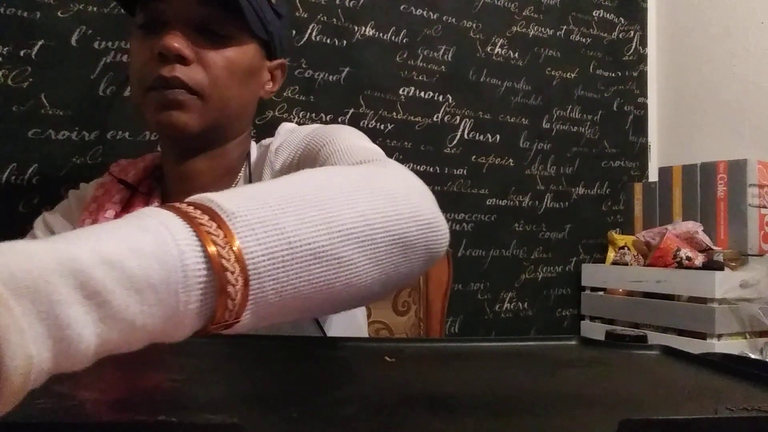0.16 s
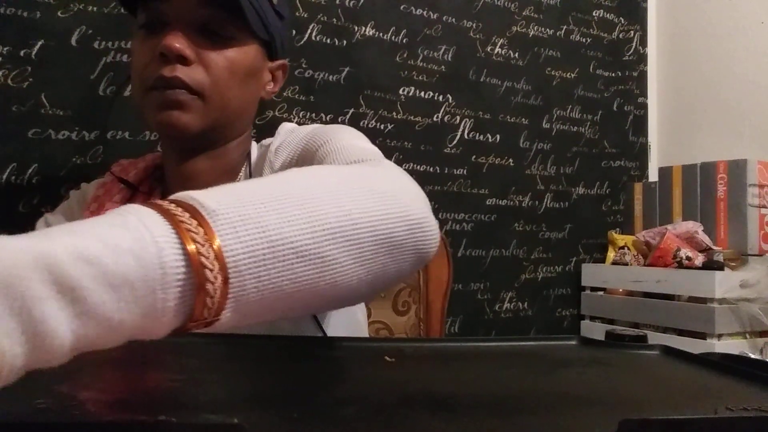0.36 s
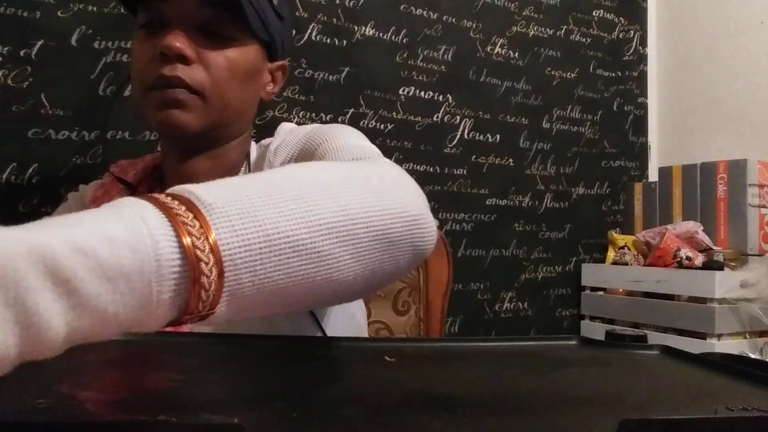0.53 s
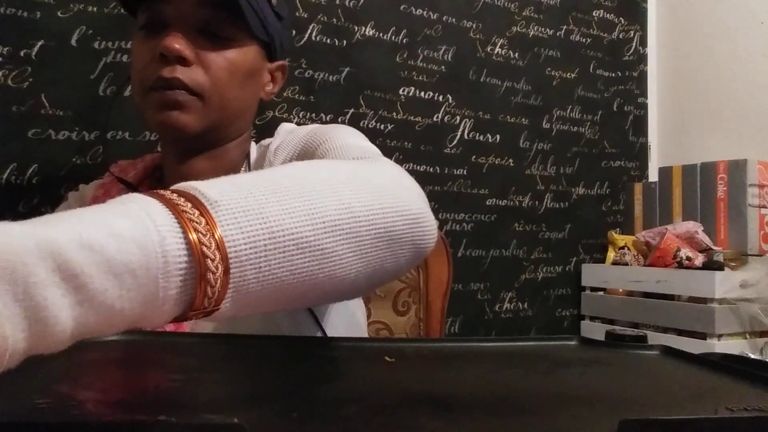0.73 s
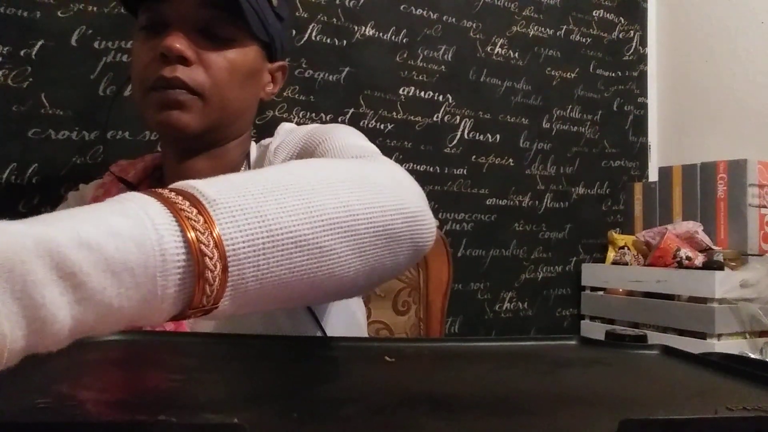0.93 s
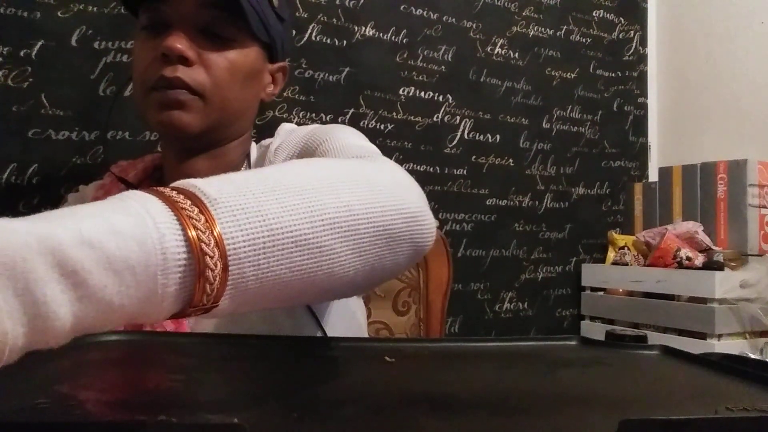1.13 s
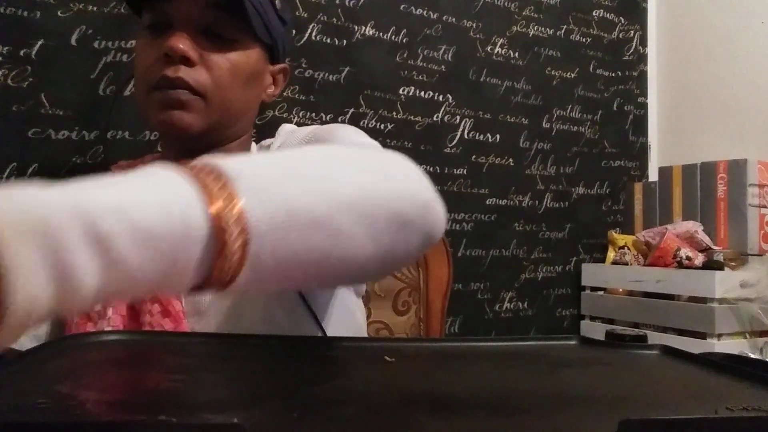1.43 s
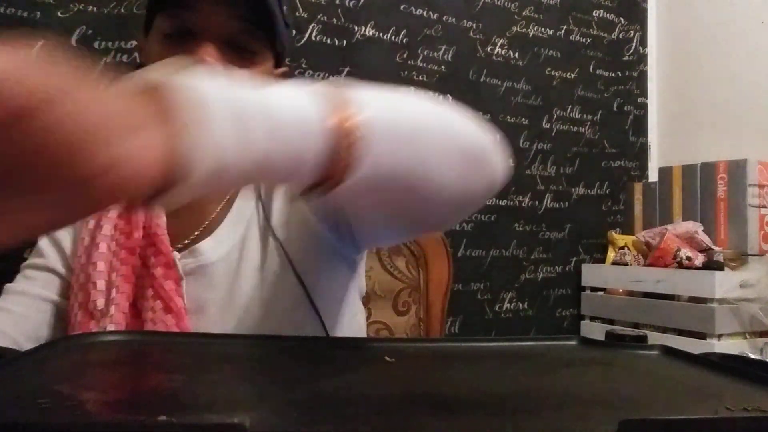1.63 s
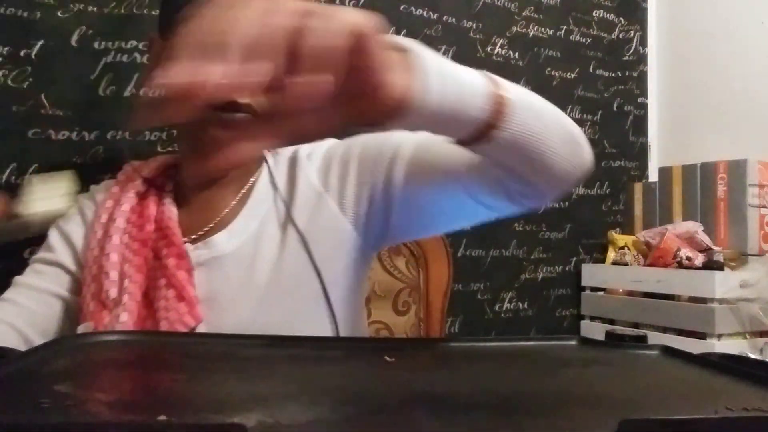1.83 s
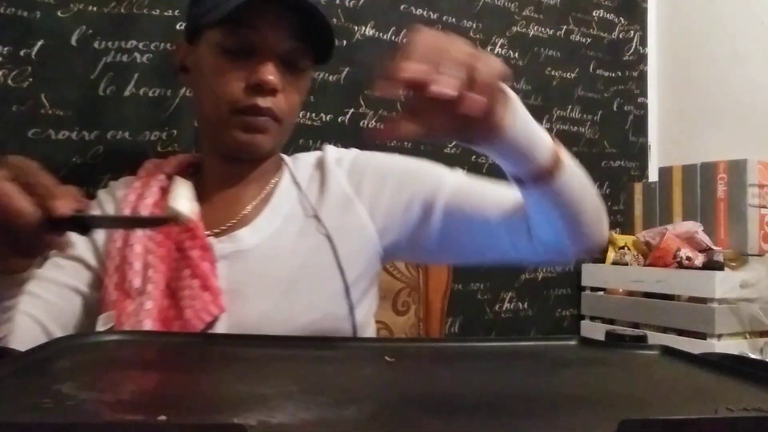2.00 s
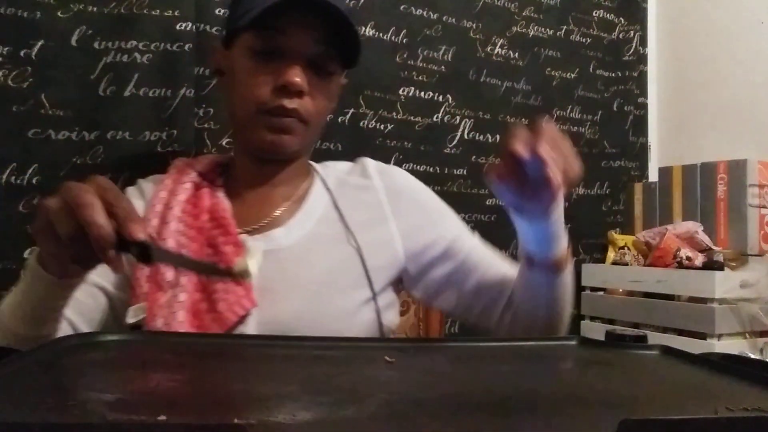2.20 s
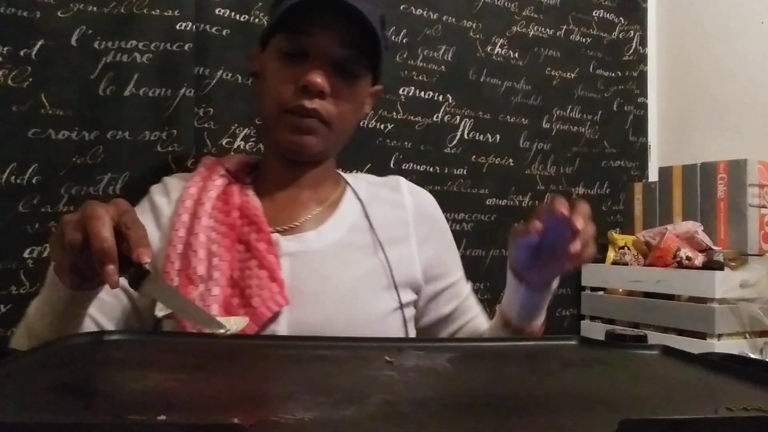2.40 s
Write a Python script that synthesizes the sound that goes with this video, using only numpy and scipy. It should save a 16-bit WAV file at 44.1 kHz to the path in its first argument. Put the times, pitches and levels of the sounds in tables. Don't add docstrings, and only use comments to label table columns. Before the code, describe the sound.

A sharp, bright plastic lid snap at about 1.06 s is by far the loudest sound. Before it, a faint slide, two light knife clinks on a dish at 0.25 and 0.29 s with slight ringing, a quick crackly saw through butter at 0.46-0.57 s, and a soft scuff near 0.9 s. Short kitchen echo follows, then faint bumps and tiny ticks over low fan hum and hiss.

```python
import sys
import numpy as np
from scipy import signal
from scipy.fft import rfft, irfft
from scipy.io import wavfile
from scipy.ndimage import uniform_filter1d

SR = 44100
rng = np.random.default_rng(int(sys.argv[2]) if len(sys.argv) > 2 else 0)


def gain_from_db(level_db):
    decades = np.asarray(level_db, float) / 20
    return 10 ** decades


def output_pcm(signal):
    pcm = np.clip(np.atleast_2d(signal).T, -1, 1) * 32767
    wavfile.write(sys.argv[1], SR, np.round(pcm).astype(np.int16))


N = 112454


def evened(x):
    return x / np.sqrt(np.mean(x ** 2) + 1e-20)


def read(points, hz):
    f, value = np.transpose(points)
    return np.interp(np.log(hz + 1), np.log(f + 1), value)


def add(mix, start_s, sound):
    part = mix[round(start_s * SR):][:len(sound)]
    part += sound[:len(part)]


def resonate(x, hz, width):
    turn = np.exp(2j * np.pi * hz * np.arange(len(x)) / SR)
    pole = np.exp(-np.pi * abs(width) / SR)
    return 2 * (turn * signal.lfilter([1 - pole], [1, -pole], x / turn)).real


def body(x, modes):
    out = 0
    for k, (hz, width, db) in enumerate(modes):
        once = resonate(x, hz, 0.99 * width)
        out = out + (-1) ** k * gain_from_db(db) * resonate(once, hz, 0.99 * width)
    return out


def clicks(events, modes, rise_share, low_width, echo_db, room_db):
    direct, crack, energy = out = np.zeros((3, N))
    t = np.arange(1500) / SR
    for s, db, fall, low_hz, low_db in events:
        fall = max(fall, 1e-4)
        rise = max(rise_share * fall, 5e-5)
        envelope = np.where(t < rise, (t / rise) ** 2, np.exp(-(t - rise) / fall))
        drive = rng.standard_normal(len(t)) * envelope
        bright = body(drive, modes)
        bright = gain_from_db(db) * bright / abs(bright).max()
        impulse = 1. * (t == t[round(rise * SR)])
        deep = body(impulse, [(low_hz, low_width, 0)])
        strength = np.linalg.norm(bright)
        start = s - rise / 2
        add(direct, start, bright + gain_from_db(db + low_db) * deep / abs(deep).max())
        add(crack, start, gain_from_db(echo_db) * drive * strength / np.linalg.norm(drive))
        onset = min(e[0] for e in events if e[0] > s - 1 / 200)
        add(energy, onset, np.array([gain_from_db(room_db) * strength]))
    return out


def drag(curve, low, high, low_db):
    out, size = np.zeros(N), SR // 5
    unevenness = 1.4 * rng.exponential(1, size // 64 + 1).repeat(64)[:size]
    grit = rng.standard_normal(size) * gain_from_db(unevenness)
    s, db = np.transpose(curve)
    level = gain_from_db(np.interp(s[0] + np.arange(size) / SR, s, db, -150, -150))
    rub = evened(body(grit, high)) + gain_from_db(low_db) * evened(body(grit, low))
    add(out, max(s[0], 0), level * evened(rub))
    return out


# (time [s], peak level [dB], decay [s], extra mode [Hz], its level [dB])
TAPS = [(.2240, -39, 0.0019, 2310, -10), (.2523, -24, 0.0016, 2120, -20), (.2527, -46.5, .0005, 3120, 3),
        (.2635, -39, 0.00081, 8100, -3), (.2891, -24.5, 0.0016, 2290, -1.5),
        (.2892, -43.5, .0005, 4100, 11), (.2893, -41, 0.00075, 900, -1.5),
        (.2896, -43.5, 0.00069, 5050, 9.5), (.3006, -32.5, 0.00054, 2100, -9),
        (.3041, -48.5, 0.0019, 900, 3.5), (.3136, -44, .002, 9000, 3)]
# (frequency [Hz], bandwidth [Hz], level [dB])
DISH = [(1500, 950, -10), (3760, 690, 4), (5200, 1300, -1), (8260, 1530, 3), (9400, 2100, -11),
        (12200, 1500, -8.5)]


def dish_taps():
    return clicks(TAPS, DISH, 0.23, 390, echo_db=-1.5, room_db=-3.0)


# (time [s], peak level [dB], decay [s], extra mode [Hz], its level [dB])
SLIPS = [(.4617, -37.5, .0007, 2030, -1.5), (.4634, -26, 0.0014, 1500, -12),
         (.4725, -35.5, .0007, 3500, -6.5), (.4752, -38, .0006, 2300, -6), (.4870, -34.5, .001, 3720, -4.5),
         (.4888, -29.5, 0.0012, 730, -9), (.4995, -47, .001, 1800, -15), (.5119, -36, 0.00089, 3810, -6),
         (.5136, -25.5, 0.001, 1500, -20.5), (.5208, -39, .0008, 6300, -5), (.5243, -41, .0006, 1500, -12),
         (.5364, -30.5, 0.001, 2170, -20), (.5406, -42, .0006, 5200, -12),
         (.5428, -30.5, 0.0016, 2210, -14), (.551, -45, 0.0014, 1500, -15), (.5570, -38, .0012, 1010, -20),
         (.5606, -32.5, 0.0006, 2110, -18.5), (.5690, -40.5, .0015, 2000, -18)]
# (frequency [Hz], bandwidth [Hz], level [dB])
BLADE = [(3470, 1460, -4.5), (5280, 1470, -2), (7870, 1210, 8), (9060, 3400, -6.5), (11700, 2000, -11),
         (14000, 3000, -22)]


def butter_slips():
    return clicks(SLIPS, BLADE, 1.7, 550, echo_db=-12., room_db=-8.5)


# (time [s], level [dB])
DRAG = [(.455, -79), (0.464, -50.5), (.51, -53), (0.549, -48.5), (.572, -57), (.585, -87)]
# (frequency [Hz], bandwidth [Hz], level [dB])
BLADE_LOW = [(750, 550, -0.45), (1600, 440, -2.1), (2300, 670, -0.94)]


def blade_drag():
    return drag(DRAG, BLADE_LOW, BLADE, low_db=-4.0)


# (time [s], peak level [dB], decay [s], extra mode [Hz], its level [dB])
SNAPS = [
    (1.0593, -43, 0.00085, 500, -3),
    (1.0610, -13, 0.00018, 800, -25),
    (1.0614, -8.5, 0.00021, 1850, -20.5),
    (1.0622, -10.5, 0.00023, 2280, -25),
    (1.0624, -30, 0.00032, 6000, 9),
    (1.0626, -33, 0.00034, 4450, 9),
    (1.0633, -21, .002, 1880, -18),
]
# (frequency [Hz], bandwidth [Hz], level [dB])
LID = [(3800, 830, -5.5), (5200, 1400, -2), (6160, 800, -9), (7640, 1500, 6), (9680, 1600, 0.5),
       (10220, 1300, -2), (13380, 4000, -17.5)]


def lid_snap():
    return clicks(SNAPS, LID, .7, 428, echo_db=2.5, room_db=-5.0)


# (frequency [Hz], level [dB], T60 [s])
RING_BEFORE = [(2353, -61, 0.39), (3055, -67.5, 0.27), (4770, -70, 0.65)]
RING_AFTER = [(1670, -61, 0.26), (2390, -68, 0.18), (2370, -63, 0.23)]
RING_LATE = [(2100, -65.5, 1.1), (2540, -65, 1.2), (3630, -64.5, .7), (4000, -75, 1.5)]


def ring(start_s, modes, swell_s, rock, length):
    out, t = np.zeros(N), np.arange(0, length, 1 / SR)
    swell = np.clip((t + 1e-4) / max(swell_s, 1e-4), 0, 1)
    fade = swell * np.clip((t[-1] - t) / (.3 * length), 0, 1)
    for hz, db, t60 in modes:
        waver = rock * evened(resonate(rng.standard_normal(len(t)), hz, 40.))
        partial = 0.81 * np.sin(2 * np.pi * hz * t) + waver
        add(out, start_s, fade * gain_from_db(db - 60 * t / t60) * partial)
    return out


def dish_rings():
    before = ring(0, RING_BEFORE, swell_s=0.00081, rock=0.42, length=0.26)
    after = ring(.295, RING_AFTER, swell_s=.02, rock=0.39, length=0.13)
    late = ring(.33, RING_LATE, swell_s=.04, rock=.15, length=.135)
    return before + after + late


# (time [s], level [dB])
SWISH = [(0, -74), (.05, -68), (.09, -71.5), (.14, -83)]
# (frequency [Hz], bandwidth [Hz], level [dB])
SWISH_BODY = [(4520, 300, 0.5), (5360, 780, -6), (2400, 2000, -9.5)]
DISH_LOW = [(2290, 360, -19), (3020, 73, -13)]


def blade_swish():
    return drag(SWISH, DISH_LOW, SWISH_BODY, low_db=-19.0)


# (time [s], peak level [dB], decay [s], extra mode [Hz], its level [dB])
SCUFFS = [(.1583, -53.5, 0.0026, 2400, -5), (.8735, -57.5, 0.0028, 5200, -4.5),
          (.8893, -53, .0015, 1885, -6), (.8951, -56, 0.0017, 5140, 1), (.8979, -48, 0.0010, 2050, 1),
          (.8981, -59.5, 0.00046, 3800, 9), (.8985, -60.5, 0.00072, 651, 8.5),
          (.9055, -49.5, .0015, 1400, -6.5), (.9142, -51.5, 0.001, 1600, 7), (0.69, -64, 0.0025, 650, 9),
          (0.59, -55, 0.0011, 2000, -8), (1.0556, -50.5, 0.002, 900, -8.5), (1.1745, -65, 0.0013, 1500, 15)]
# (frequency [Hz], bandwidth [Hz], level [dB])
SCUFF = [(3740, 1080, -2), (5040, 660, 0.5), (6754, 1200, -8), (8700, 2200, -1)]


def scuffs():
    return clicks(SCUFFS, SCUFF, 0.73, 750, echo_db=-10.5, room_db=-1.0)


# (time [s], level [dB])
RUB = [(.865, -99), (.875, -62.5), (.89, -66.5), (.92, -54.5), (.94, -90), (.97, -82)]
# (frequency [Hz], bandwidth [Hz], level [dB])
SCUFF_LOW = [(650, 310, 8), (1600, 700, -1), (2350, 550, -6)]


def sleeve_rub():
    return drag(RUB, SCUFF_LOW, SCUFF, low_db=10.5)


# (time [s], peak level [dB], decay [s], low mode [Hz], low level [dB])
SPECKS = [
    (1.3715, -56.5, .002, 497, -21),
    (2.055, -58.5, 0.0023, 498, -26),
]


def specks():
    return clicks(SPECKS, BLADE, 0.829, 400, echo_db=-8., room_db=-7.0)


# (time [s], frequency [Hz], level [dB], half-length [s])
BUMPS = [(0.047, 47.2, -66, 0.046), (.2, 45.4, -74, 0.04), (0.31, 50.5, -69, 0.033),
         (.842, 189, -51, 0.019), (.915, 179.5, -52, 0.037), (1.01, 90.3, -54, 0.011),
         (1.064, 544, -47, 0.0035), (1.068, 840, -47.5, 0.0063), (1.073, 252, -51.5, .012),
         (1.089, 300, -51.5, 0.019), (1.101, 1930, -63, 0.011), (1.118, 424, -53.5, .012),
         (1.121, 196, -54, 0.02), (1.139, 60, -61, 0.049), (1.144, 745, -58, .01),
         (1.175, 550, -56.5, .014), (1.178, 760, -56, 0.0082), (1.205, 370, -53.5, 0.0066),
         (1.268, 71, -67, 0.035), (2.28, 151.4, -56.5, .015), (2.41, 59.9, -68, 0.026),
         (2.54, 59, -62, 0.033)]


def bumps():
    out = np.zeros(N)
    for s, hz, db, length in BUMPS:
        t = np.arange(-length, length, 1 / SR)
        swell = np.cos(np.pi * t / length / 2) ** 2
        add(out, s - length, gain_from_db(db) * swell * np.cos(2 * np.pi * hz * t))
    return out


# (delay [s], level [dB])
ECHOES = [(.0071, 0.5), (.0098, -8), (.0117, -8), (.0163, -7), (.023, -17.5), (.030, -18.5)]
# (frequency [Hz], T60 [s])
ROOM_T60 = [(500, 0.208), (2000, 0.39), (4000, 0.33), (8000, 0.3), (14000, 0.17)]
# (frequency [Hz], level [dB])
ROOM_TONE = [(300, -49), (900, -26.5), (2900, -27), (4300, -13), (6300, -15), (7700, -2), (9700, -3),
             (12000, -22.5)]
# (frequency [Hz], level [dB])
WALL_LOSS = [(9500, 0.5), (12000, -6), (16000, -14)]


def kitchen(direct, crack, energy):
    hz, t, z = signal.stft(rng.standard_normal(SR // 2), SR, nperseg=256)
    decay = gain_from_db(-60 * t / read(ROOM_T60, hz)[:, None])
    tail = signal.istft(z * decay, SR, nperseg=256)[1]
    tail = tail * np.clip(np.arange(len(tail)) / SR / 0.0046 - .6, 0, 1)
    tail = gain_from_db(0.5) * tail / np.linalg.norm(tail)
    walls = np.zeros(len(tail))
    for delay, db in ECHOES:
        add(walls, delay, np.array([gain_from_db(db)]))
    wet = signal.fftconvolve(crack, walls)[:N] + signal.fftconvolve(energy, tail)[:N]
    hz = np.fft.rfftfreq(N, 1 / SR)
    toned = irfft(rfft(wet) * gain_from_db(5 + read(ROOM_TONE, hz)), N)
    echoed = rfft(signal.fftconvolve(direct, tail + walls)[:N])
    return toned + irfft(echoed * gain_from_db(-17 + read(WALL_LOSS, hz)), N)


def air(colour, patchy_db):
    frames, hz = N // 256 + 5, np.fft.rfftfreq(1024, 1 / SR)
    a, b, patches = rng.standard_normal((frames, 513, 3)).T
    patches = uniform_filter1d(patches, size=10, axis=0)
    patches = evened(uniform_filter1d(patches, size=12, axis=1))
    z = (a + 1j * b) * gain_from_db(read(colour, hz)[:, None] + patchy_db * patches)
    return evened(signal.istft(z, nperseg=1024, noverlap=768)[1][:N])


# (frequency [Hz], spectral density [dB per Hz])
FAN = [(12, -66), (20, -41.5), (86, -32), (113, -18), (181, -1), (213, -1.5), (341, -2.5), (401, -5.5),
       (1500, -25.5), (1950, -59), (3300, -120)]
# (frequency [Hz], bandwidth [Hz], level [dB])
FAN_MOANS = [(132, 14.79, -72), (184.5, 16, -65.5), (347.3, 25, -69.5), (528, 36, -72)]


def fan():
    moans = sum(gain_from_db(db) * evened(resonate(rng.standard_normal(N), hz, width))
                for hz, width, db in FAN_MOANS)
    return gain_from_db(-63.5) * air(FAN, patchy_db=1.5) + moans


# (frequency [Hz], spectral density [dB per Hz])
HISS = [(710, -31), (1200, -5.5), (1510, 1), (4040, -3.5), (6160, -8.5), (8260, 2), (10500, -4),
        (15000, -3), (16000, -13)]


def microphone_hiss():
    return gain_from_db(-70) * air(HISS, patchy_db=0.2)


def scene():
    hits = dish_taps() + butter_slips() + lid_snap() + scuffs() + specks()
    rubs = blade_drag() + blade_swish() + sleeve_rub()
    floor = fan() + microphone_hiss()
    return (hits[0] + rubs + kitchen(*hits) + dish_rings() + bumps() + floor)[None]


def low_pass(x):
    return signal.sosfilt(signal.butter(12, 17040, fs=SR, output="sos"), x)


def record(dry):
    lowpass = signal.firwin(255, 16700, fs=SR)
    mix = signal.oaconvolve(dry, lowpass[None], "same")
    return low_pass(mix)


dry = scene()
out = record(dry)
output_pcm(out)
```